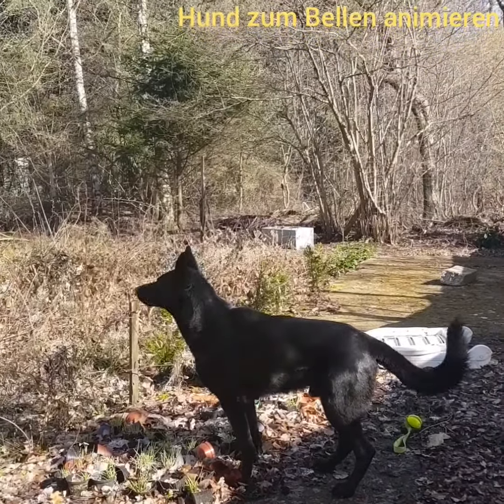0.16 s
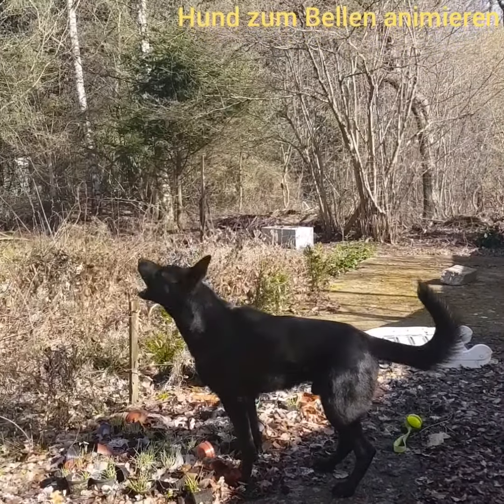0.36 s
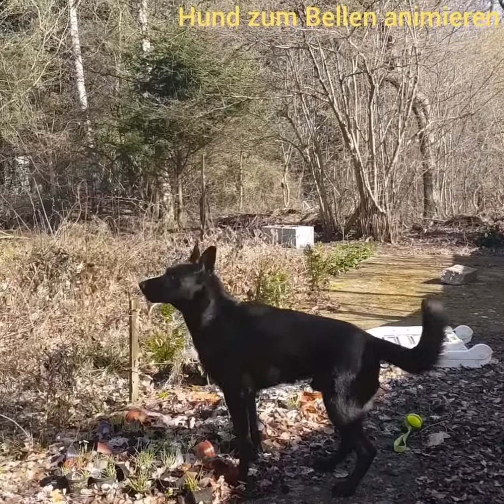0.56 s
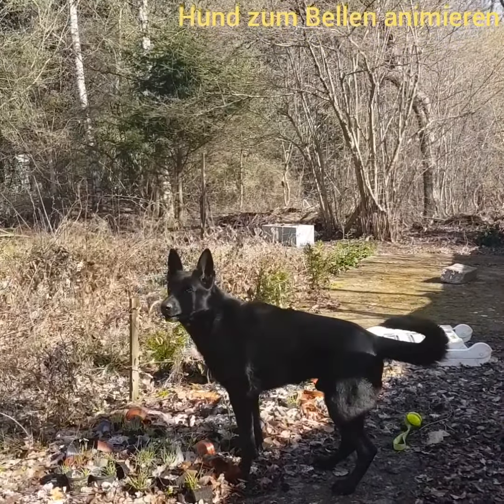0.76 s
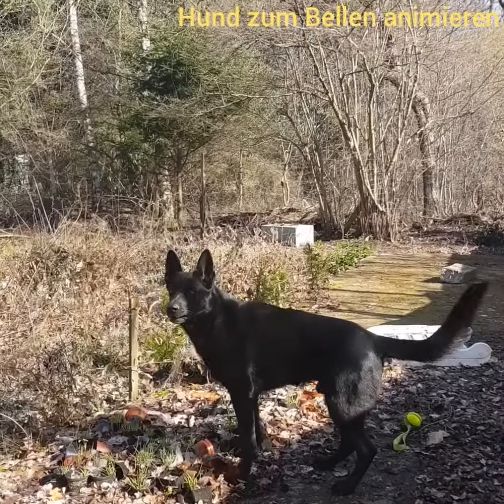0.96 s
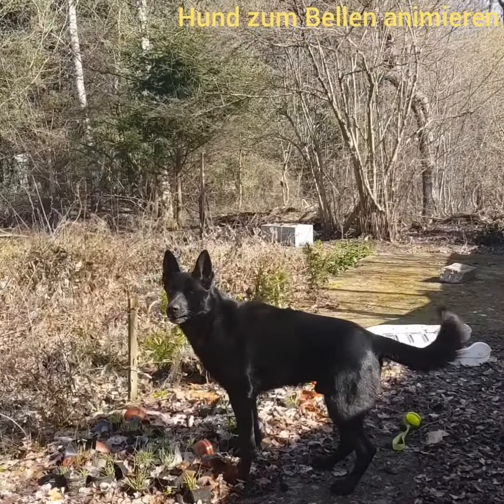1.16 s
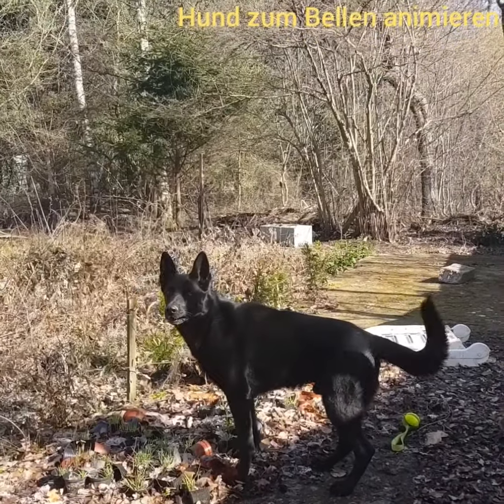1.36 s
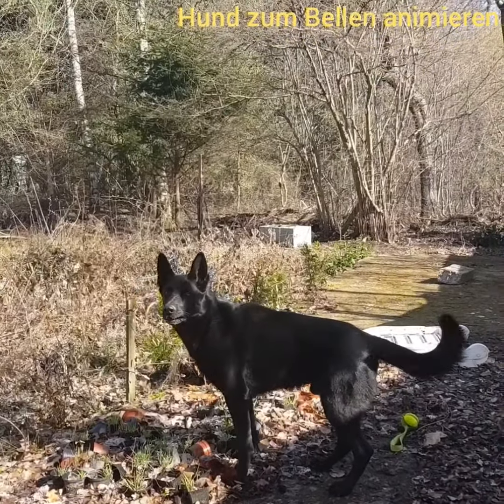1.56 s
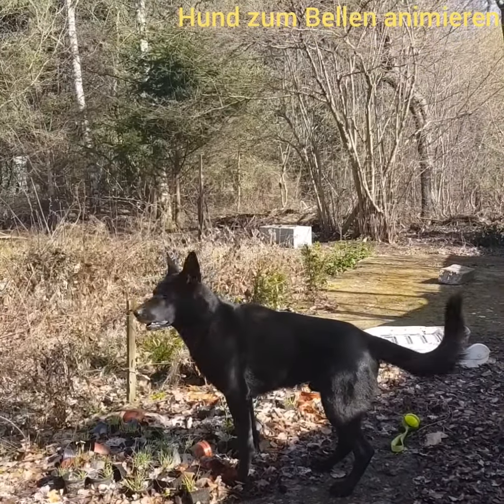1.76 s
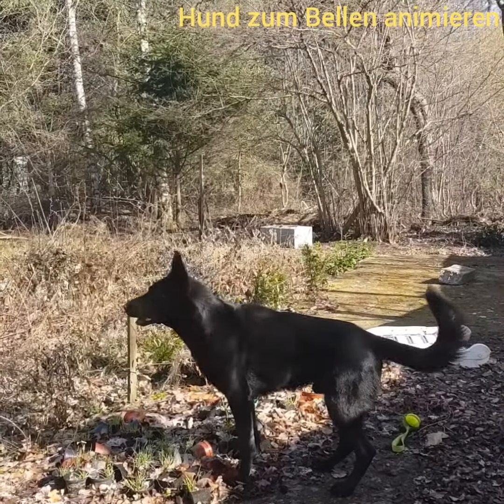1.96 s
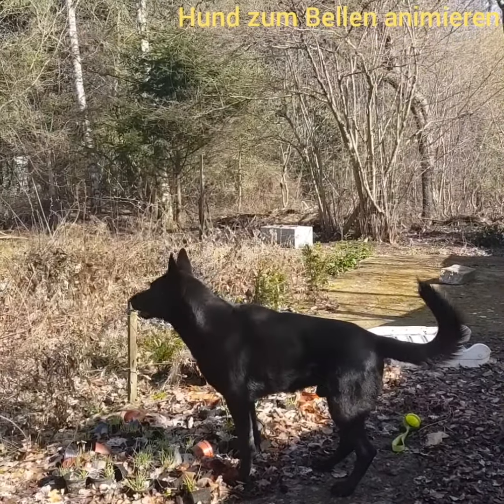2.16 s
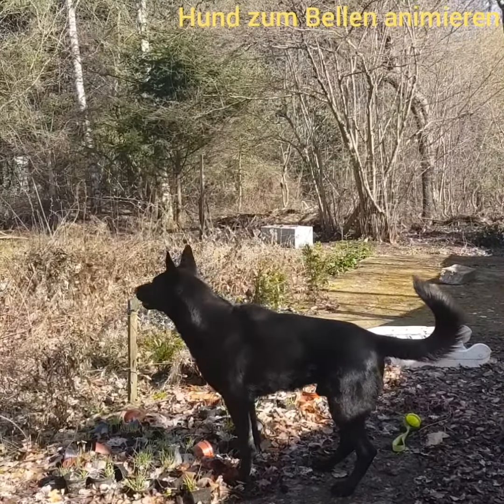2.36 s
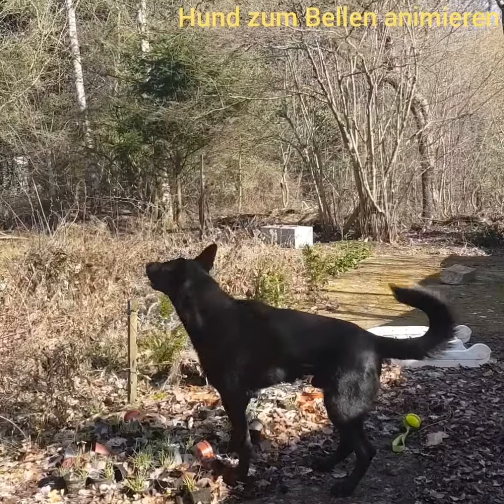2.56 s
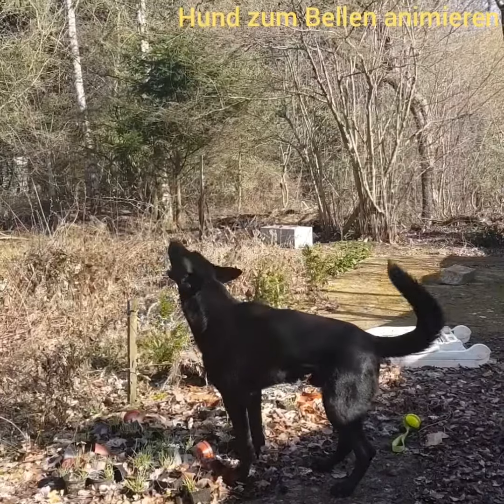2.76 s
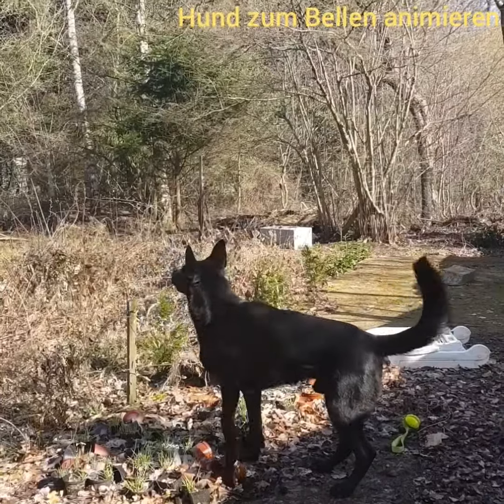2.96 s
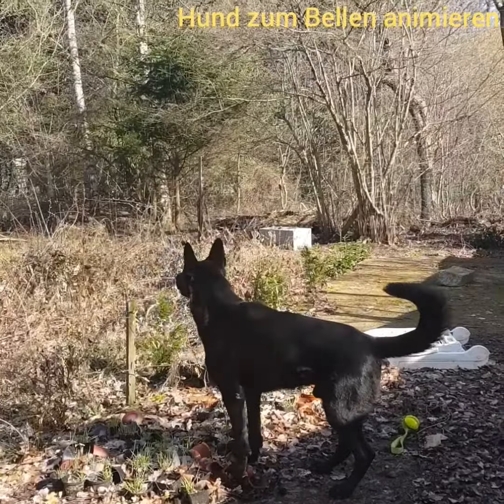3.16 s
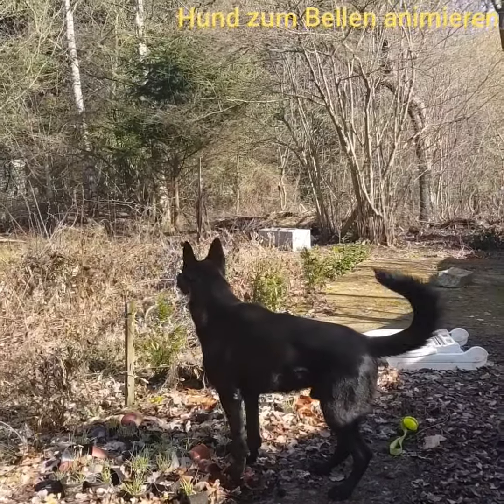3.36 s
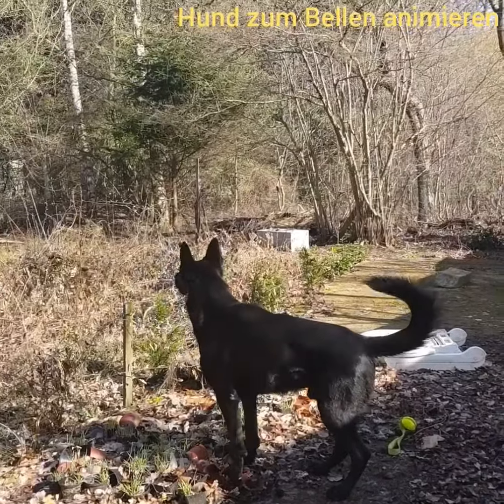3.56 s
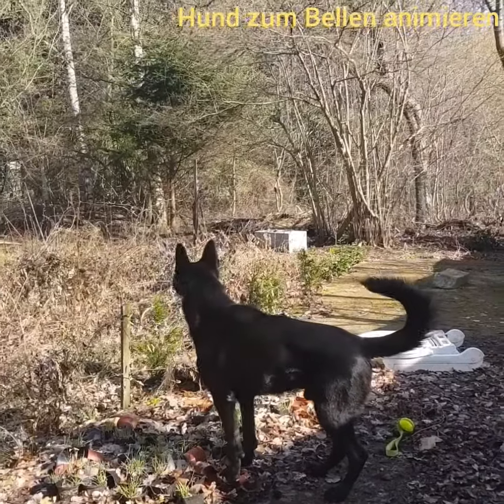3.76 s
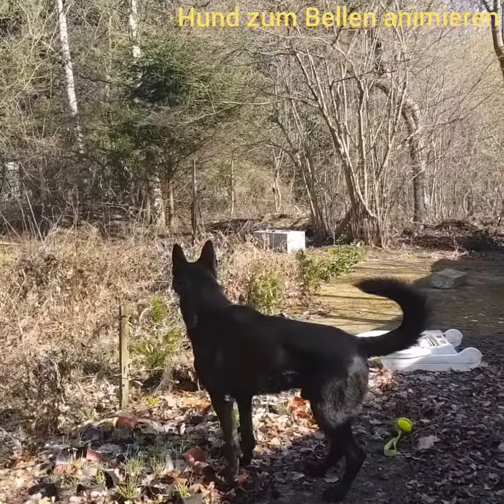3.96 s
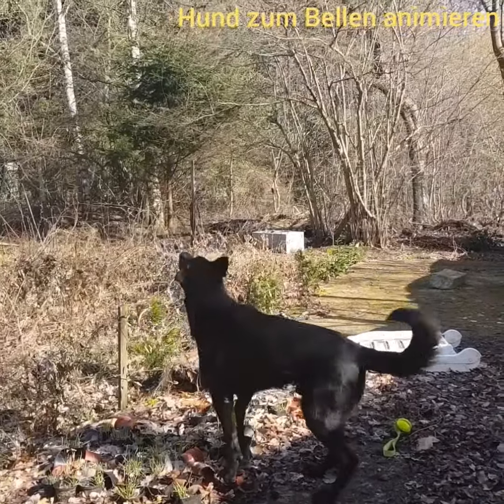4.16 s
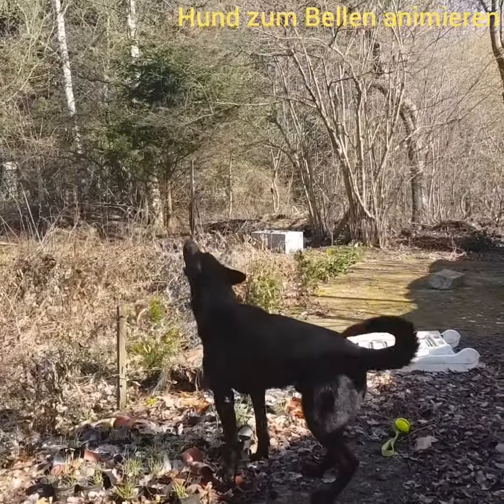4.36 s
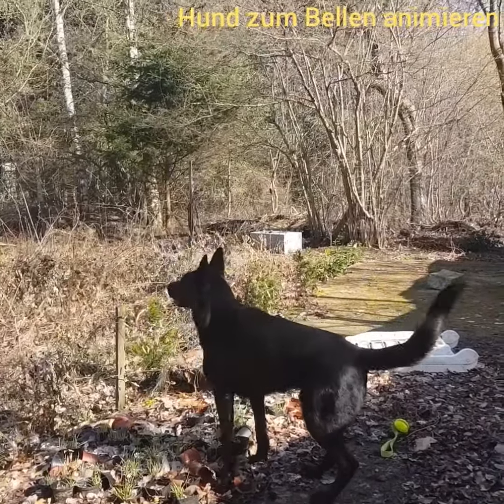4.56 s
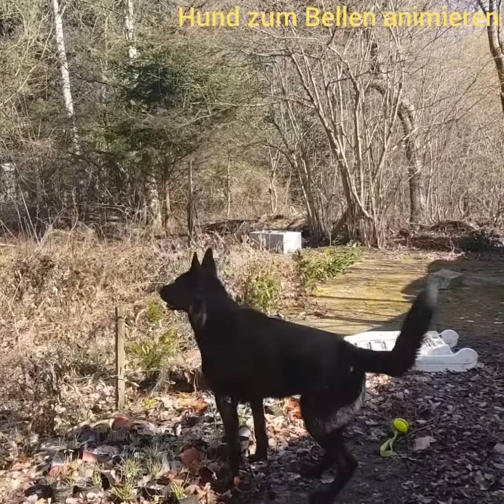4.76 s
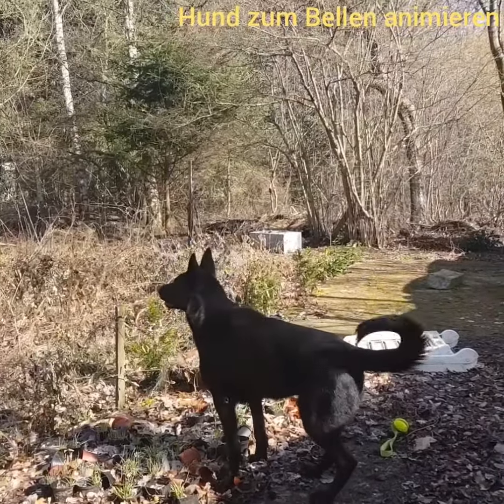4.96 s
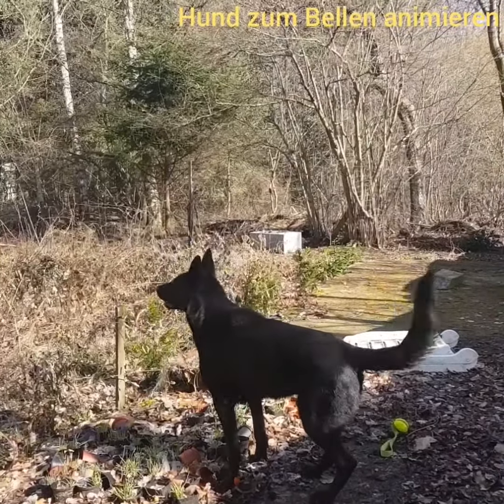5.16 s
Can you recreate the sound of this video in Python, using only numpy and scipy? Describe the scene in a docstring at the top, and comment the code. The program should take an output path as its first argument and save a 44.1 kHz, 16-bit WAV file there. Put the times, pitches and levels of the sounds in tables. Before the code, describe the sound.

A large dog barks once, then two quick pairs of hoarse barks with low growls, in a quiet leafy garden by a wood.

```python
"""A garden at the edge of a wood: a road drones, a bass rumble swells, dry leaves rustle, far engine tones waver.
A large dog a few metres from a phone barks once, then twice, then twice, with low growls around the barks.
Each bark is an arching pitch with a strong second partial, a second throat tone beating against it, and breath.
Near sheds, foliage and far trunks answer each bark as decaying noise echoes.
From 1.7 s on, dry leaves also tick now and then: short bursts of noise."""
import sys
import numpy as np
from scipy import signal
from scipy.fft import rfft, irfft
from scipy.io import wavfile
from scipy.ndimage import uniform_filter1d, minimum_filter1d

SR = 44100
rng = np.random.default_rng(int(sys.argv[2]) if len(sys.argv) > 2 else 0)


def store_wav(level_fs):
    """Save 16-bit WAV to argv[1]."""
    pcm = np.round(np.clip(np.atleast_2d(level_fs), -1, 1) * 32767)
    wavfile.write(sys.argv[1], SR, pcm.T.astype(np.int16))


N = 229275
T = np.arange(N) / SR


def undb(db):
    """Turn decibels into a plain factor."""
    return 10 ** (np.asarray(db) / 20)


def unit(x):
    """Scale to an average (rms) level of 1."""
    return x / np.sqrt(np.mean(x ** 2))


def tracks(tables, silent):
    """Draw each column as a smooth curve; silent columns go from dB to factors and fade out between tables."""
    rows = np.vstack(tables)
    columns = [np.interp(T, rows[:, 0], c) for c in rows.T[1:]]
    inside = sum((T >= t[0][0]) & (T <= t[-1][0]) for t in tables)
    fade = uniform_filter1d(1. * inside, size=600)
    return [undb(c) * fade if k in silent else c for k, c in enumerate(columns)]


def resonate(x, modes):
    """Sum of resonances, each applied twice for dark valleys between them."""
    out = 0
    for hz, width_hz, db in modes:
        b, a = signal.iirpeak(hz, hz / width_hz, fs=SR)
        once = signal.lfilter(b, a, x)
        out = out + undb(db) * signal.lfilter(b, a, once)
    return out


def walk(rate):
    """Smooth chance with spread 1, changing about rate times a second."""
    k = int(SR / rate)
    smoothed = uniform_filter1d(rng.standard_normal(N), k)
    return unit(uniform_filter1d(smoothed, k))


def wide_noise(points, alike_hz, flicker_db):
    """Stereo noise whose half-octave bands flicker one by one; the ears grow alike below alike_hz."""
    hz, db = np.transpose(points)
    f = np.maximum(np.fft.rfftfreq(N, 1 / SR), 1)
    spectrum = undb(np.interp(np.log(f), np.log(hz), db, -120, -120))
    mid, side = rfft(rng.standard_normal((2, N))) * spectrum
    side = side * f / np.hypot(f, alike_hz)
    ears = np.array([mid + side, mid - side])
    out = 0
    for centre in 2 ** np.arange(np.log2(hz[0]), np.log2(hz[-1]) + .5, .5):
        band = np.cos(np.pi * np.clip(np.log2(f / centre), -.5, .5))
        out = out + undb(flicker_db * walk(12)) * irfft(band * ears, N)
    return unit(out)


# loudness of the garden noises: (time [s], road level [dB], rumble level [dB], leaf rustle level [dB])
GARDEN_LEVELS = [(0.0, -48.5, -55, -67.5), (0.3, -45.5, -52, -63.5), (0.77, -49, -62, -66.5),
                 (1.04, -50.5, -60, -70.5), (1.51, -53, -67, -67), (1.75, -50, -59, -64),
                 (2.0, -46.5, -55.5, -59), (2.35, -47.5, -47, -61), (2.7, -48, -59.5, -62.5),
                 (3.19, -53.5, -59, -65), (3.58, -55, -58.5, -71), (3.84, -53.5, -61.5, -65.5),
                 (4.1, -49.5, -52.5, -60.5), (4.6, -51.5, -60, -62), (4.92, -53, -68, -64.5),
                 (5.2, -54, -63, -65)]
# colour of each noise, only the shape counts: (frequency [Hz], relative density [dB])
ROAD_SPECTRUM = [(65, -42.5), (110, 0.5), (137, -1), (156, -4), (211, -8), (521, -6), (682, -10),
                 (1140, -8.5), (6000, -30), (7800, -34.5), (13200, -120)]
RUMBLE_SPECTRUM = [(12, -50.5), (20, -31.5), (48, 4.5), (64, -1), (86, -2.5), (130, -18), (170, -38.5),
                   (290, -120)]
RUSTLE_SPECTRUM = [(1760, -30.5), (3000, -7), (5480, -7.5), (7430, -4.5), (8600, -7), (11700, -6.5),
                   (14600, -11)]
# far engines, one list per spell: (time [s], tone [Hz], level [dB])
ENGINE_TONES = [
    [(0.0, 129.7, -45), (0.144, 137.6, -64.5), (0.362, 146.5, -43.5), (0.534, 149, -68),
     (0.582, 155.3, -50), (1.0, 169, -70)],
    [(3.3, 114, -73.5), (4.208, 145.2, -56.5), (4.288, 143.4, -52), (4.404, 149.8, -54),
     (4.484, 136.5, -58), (4.6, 146, -56), (5.199, 156.8, -60.5)],
]


def garden():
    """Noises shaped like a road, a bass rumble and leaves, plus an engine tone with another at a third its pitch."""
    road, rumble, rustle = tracks([GARDEN_LEVELS], silent=(0, 1, 2))
    hz, engine = tracks(ENGINE_TONES, silent=(1,))
    turn = 2 * np.pi * np.cumsum(hz) / SR
    waver = undb(2 * walk(36))
    tone = np.sqrt(2) * engine * waver * (np.sin(turn) + undb(-5.5) * np.sin(turn / 3))
    crackle = undb(0.69 * walk(60))
    return (road * wide_noise(ROAD_SPECTRUM, alike_hz=1460, flicker_db=3.5)
            + rumble * wide_noise(RUMBLE_SPECTRUM, alike_hz=150, flicker_db=3.5)
            + rustle * crackle * wide_noise(RUSTLE_SPECTRUM, alike_hz=6860, flicker_db=-1.0)
            + tone)


# a chest growl that leads barks in and trails them, one list per growl: (time [s], pitch [Hz], level [dB])
GROWLS = [
    [(0.36, 151.4, -41), (0.376, 158.4, -52), (0.42, 198, -32.5), (0.44, 200, -45)],
    [(2.37, 203.5, -64), (2.404, 202.4, -52.5), (2.458, 218, -34.5), (2.47, 224, -43.5)],
    [(2.6, 177.3, -52), (2.626, 173.6, -46.5), (2.688, 142.2, -48), (2.76, 180.2, -45.5)],
    [(2.88, 196, -46.5), (2.914, 197.7, -51.5), (2.946, 224, -57.5), (3.06, 204.5, -58)],
    [(3.99, 179.4, -63), (4.028, 187, -58), (4.08, 184.1, -38), (4.09, 185.1, -48)],
    [(4.2, 152.3, -60), (4.266, 151.8, -45), (4.282, 158.5, -50), (4.34, 182.7, -47.5)],
]


def growl():
    """A low tone from the chest, slightly shaky in level."""
    hz, size = tracks(GROWLS, silent=(1,))
    shake = undb(1.5 * walk(40))
    return np.sqrt(2) * size * shake * np.sin(2 * np.pi * np.cumsum(hz) / SR)


# effort is the 2nd partial's level with its short breaks bridged, counted in dB from full voice
FULL_DB, BREAK_S = -7, .05
UPPER_PER_DB, BREATH_PER_DB = 0.96, 0.7  # dB that upper voice and breath change for each dB of effort
SATURATES_DB = -1.5  # breath grows no further above this effort
FIRST_PER_DB = 0.72  # the 1st partial falls more slowly than effort, so it leads the bark in
FIRST_IN_BREAK = 0.31  # dB that the 1st partial gains for each dB of a break
OPEN_HZ, CHOKE_DB_PER_HZ, CHOKED_DB = 348, .45, -22.5  # below this pitch the 1st partial is choked, to a limit
REST_HZ, TONE_PER_HZ = 199.05, .3  # the throat tone climbs with the pitch, counted from this pitch
ROUGH_PER_DB, ROUGH_PER_HZ_S = .025, 6e-5  # a weak 2nd partial and fast glides roughen the voice
HISS_AT_DB, HISS_S = -12, .022  # effort at which the mouth bursts open; decay of that hiss

# five barks, one list each; the 2nd partial dips where the voice breaks:
# (time [s], pitch before wobble [Hz], 2nd partial level [dB], throat tone level [dB])
BARK_CURVES = [
    [(.37, 150.2, -72.5, -59), (.4, 166.7, -28.5, -30.5), (.415, 207.3, -21, -16), (.432, 230.8, -5.5, -21),
     (.442, 320.4, -10.5, -17), (.472, 360, -11.5, -25), (.487, 358.3, -14, -29), (.505, 378, -10.5, -18),
     (.528, 330.4, -6.5, -17), (.545, 262.4, -14, -49), (.57, 200, -62, -97)],
    [(2.38, 100.8, -73, -58), (2.425, 140.2, -49.5, -35), (2.45, 201.5, -23, -24.5),
     (2.465, 310.3, -14, -21), (2.48, 318, -10, -19.5), (2.5, 350, -10, -15.5), (2.522, 352.7, -6, -14.5),
     (2.536, 384.8, -16, -4), (2.555, 368, -6.5, -34.5), (2.59, 280.3, -14, -37.5),
     (2.612, 238.5, -17, -45.5), (2.65, 191.1, -53.5, -55.5)],
    [(2.71, 171, -77.5, -41.5), (2.74, 194.7, -26, -25), (2.769, 235.8, -12, -10), (2.78, 317, -8.5, -13),
     (2.8, 342.4, -11, -23.5), (2.825, 345, -6.5, -25.5), (2.85, 341.2, -11, -36), (2.87, 276.8, -13, -42),
     (2.885, 219.3, -20, -67.5), (2.905, 206.4, -20, -83), (2.94, 190, -51, -89.5)],
    [(3.98, 110.2, -77.5, -58), (4.03, 129.9, -61, -45.5), (4.06, 166.4, -40.5, -33),
     (4.082, 230.6, -18.5, -19), (4.11, 344.1, -2.5, -15.5), (4.128, 366.1, -17.5, -23),
     (4.145, 378.7, -5.5, -19.5), (4.165, 340.5, -23, -9.5), (4.18, 364.2, -6.5, -19),
     (4.198, 303, -11, -29), (4.225, 259, -23, -19.5), (4.265, 200, -47, -42)],
    [(4.29, 166.9, -80.5, -44), (4.32, 183.9, -22, -47), (4.338, 206.1, -16.5, -48.5),
     (4.355, 309.7, -3.5, -44), (4.372, 332.7, -4.5, -45), (4.405, 350.6, -16, -16.5),
     (4.432, 334.6, -4, -43), (4.452, 279.8, -12, -37), (4.472, 216.7, -15.5, -50),
     (4.5, 195.2, -52.5, -63)],
]
# colour of each bark at full effort: (roughness [0-1], 1st partial level [dB], upper voice level [dB],
# lower mouth resonance gain [dB], breath level [dB], onset hiss level [dB], throat tone at REST_HZ [Hz])
BARK_COLOURS = [(0.29, -17.5, -22.5, -1, -39.5, -49, 445), (0.38, -20, -25.5, 1.5, -41.5, -38.5, 435),
                (0.14, -18, -29, 0, -47, -41, 450), (0.37, -17, -29, 1, -44, -52, 435),
                (0.13, -19.5, -31.5, -3.5, -48, -55, 455)]


def controls():
    """Pitch and effort set the level of the voice's parts, its roughness and the throat tone's pitch."""
    hz, second, tone = tracks(BARK_CURVES, silent=(1, 2))
    second_db = 20 * np.log10(second + 1e-6)
    starts = [bark[0][0] for bark in BARK_CURVES]
    which = np.maximum(np.searchsorted(starts, T) - 1, 0)
    hoarse, first_db, upper_db, jaw_db, breath_db, hiss_db, tone_hz = np.array(BARK_COLOURS)[which].T
    tone_hz = tone_hz + TONE_PER_HZ * (hz - REST_HZ)

    # a running maximum, then a running minimum, bridge the breaks
    span = int(BREAK_S * SR)
    highest = -minimum_filter1d(-second_db, size=span)
    bridged_db = minimum_filter1d(highest, size=span)
    effort = bridged_db - FULL_DB

    break_depth = effort + FULL_DB - second_db
    first_db = first_db + FIRST_PER_DB * np.minimum(effort, 0) + FIRST_IN_BREAK * break_depth
    first_db = first_db + np.clip(CHOKE_DB_PER_HZ * (hz - OPEN_HZ), CHOKED_DB, 0)

    glide = np.abs(np.gradient(hz)) * SR  # Hz per second
    rough = hoarse + ROUGH_PER_DB * np.maximum(FULL_DB - second_db, 0) + ROUGH_PER_HZ_S * glide
    rough = uniform_filter1d(np.clip(rough, 0, .6), size=300)

    opens = np.diff(1. * (effort > HISS_AT_DB), prepend=0) > 0
    hiss = undb(hiss_db) * signal.lfilter([1], [1, -np.exp(-1 / (HISS_S * SR))], opens)
    hiss = uniform_filter1d(hiss, size=200)

    breath_db = breath_db + BREATH_PER_DB * np.minimum(effort - SATURATES_DB, 0)
    levels = undb([first_db, upper_db + UPPER_PER_DB * effort, jaw_db, breath_db])
    return hz, tone_hz, rough, second, tone, hiss, levels


# resonances, each passed twice: (frequency [Hz], width of one pass [Hz], relative gain [dB])
THROAT_RESONANCES = [(470.6, 268, 3), (651.3, 307, 2.5)]
# the two mouth resonances, the lower one also moved by the bark's colour: same columns
MOUTH_RESONANCES = [(1240, 260, 0), (1900, 340, -6)]
# whistling gaps between the teeth: same columns
TEETH_GAPS = [(4433, 630, 1.5), (5000, 5200, -4.5), (7200, 390, -5), (10160, 2000, -15)]


def dog():
    """Vocal folds sing clean partials; a second tone beats with them and rocks the buzz; air hisses each cycle."""
    hz, tone_hz, rough, second, tone, hiss, (first, upper, jaw, breath) = controls()
    phase = 2 * np.pi * np.cumsum(hz * (1 + .04 * rough * walk(150))) / SR
    beat = 2 * np.pi * np.cumsum(tone_hz * (1 + .06 * rough * walk(120))) / SR

    shimmer = undb(4 * rough * walk(120))
    low = second * shimmer * np.sin(2 * phase) + first * np.sin(phase + 1.7)
    low = low + tone * undb(3.08 * walk(120)) * np.sin(beat)
    # while the pitch is low the third partial falls on the throat resonance
    on_throat = np.exp(-((3 * hz - 670) / 90) ** 2)
    low = low + second * undb(-5) * on_throat * np.sin(3 * phase + 1.97)

    puff = np.exp(.8 * np.cos(phase))  # air flow of each cycle
    throat_noise = resonate(puff * rng.standard_normal(N), THROAT_RESONANCES)
    rasp = second * rough * undb(-0.5) * unit(resonate(throat_noise, THROAT_RESONANCES))

    def mouth(x):
        return jaw * resonate(x, MOUTH_RESONANCES[:1]) + resonate(x, MOUTH_RESONANCES[1:])

    buzz = sum(undb(3 * walk(40)) * np.cos(k * phase) for k in range(2, 8))  # each partial wavers alone
    # the second tone rocks the closing of the folds: sidebands round the upper partials
    rocking = (.3 + 1.5 * rough) * undb(4 * walk(30)) * np.cos(beat)
    buzz = buzz * (1 + rocking)
    buzz = unit(mouth(buzz)) + .7 * rough * unit(mouth(puff * rng.standard_normal(N)))
    # side pockets of the throat cut the voice above here
    buzz = signal.sosfilt(signal.butter(6, 2250, fs=SR, output="sos"), buzz)

    # the jet of air sputters in and out of each gap; one noise is shared, two belong to one ear each
    air = sum(undb(3 * walk(40)) * resonate(puff * rng.standard_normal((3, N)), [gap]) for gap in TEETH_GAPS)
    air = unit(air[0] + 2.2 * air[1:])
    burst = unit(resonate(rng.standard_normal((2, N)), [(5700, 1300, 0)]))
    return np.sqrt(2) * low + rasp, upper * buzz, breath * air + hiss * burst


# how far the right port runs ahead of the left: (frequency [Hz], phase lead [radians])
RIGHT_PHASE_LEAD = [(0, 0), (300, .3), (650, .9), (1200, 1.25), (2100, .55), (4000, .9)]
LEFT_LOW_DB = 2


def ports(x):
    """The right port hears the dog first; the left one is fuller in the low mids."""
    lag = np.interp(np.fft.rfftfreq(N, 1 / SR), *np.transpose(RIGHT_PHASE_LEAD))
    late = irfft(rfft(x) * np.exp(-1j * lag), N)
    fuller = (undb(LEFT_LOW_DB) - 1) * resonate(late, [(379, 150, 0.011)])
    return np.array([late + fuller, x])


def echo(x, start, rise, t60, low_hz, high_hz):
    """Many scatterers: a decaying noise response that differs between the ears."""
    t = np.maximum(T[:2 * SR] - start, 0)
    shape = (1 - np.exp(-t / rise)) * 1000 ** (-t / t60)
    common, apart = rng.standard_normal((2, len(t)))
    response = shape * (common + 0.33 * apart * np.array([[1], [-1]]))
    band = signal.butter(4, [low_hz, high_hz], "band", fs=SR, output="sos")
    response = signal.sosfilt(band, response)
    response = response / np.sqrt(np.mean(np.sum(response ** 2, axis=1)))
    return signal.fftconvolve(np.broadcast_to(x, (2, N)), response, axes=1)[:, :N]


# what answers the dog: (start [s], build-up [s], time to fall 60 dB [s], low edge [Hz], high edge [Hz])
SHED_ECHO = (.01, .01, .32, 300, 6000)
FOLIAGE_ECHO = (.03, .04, .45, 900, 12000)
TRUNK_ECHO = (.1, .06, 2.2, 680, 1000)
SHEDS_DB, TRUNKS_DB = -22, -51
FOLIAGE_VOICE_DB, FOLIAGE_AIR_DB = -22.5, -14.5


def echoes(bark, low, upper, air):
    """Sheds return the whole bark, foliage the upper voice and breath, trunks the voice in a narrow band."""
    leaves = undb(FOLIAGE_VOICE_DB) * upper + undb(FOLIAGE_AIR_DB) * air
    return (undb(SHEDS_DB) * echo(bark, *SHED_ECHO)
            + undb(TRUNKS_DB) * echo(low + upper, *TRUNK_ECHO)
            + echo(leaves, *FOLIAGE_ECHO))


# snapping leaves: (time [s], peak level [dB], centre of the noise [Hz])
LEAF_TICKS = [(1.669, -45, 9570), (3.0588, -51, 10180), (3.159, -48, 10810), (3.483, -49.5, 11280),
              (3.904, -47.5, 7270), (4.596, -36, 7730), (4.6458, -43.5, 7850), (4.7058, -45, 10260),
              (4.8342, -46, 7810), (5.061, -46, 7560)]


def ticks():
    """Dry leaves snap: short bursts of noise round a high pitch."""
    size = 600  # samples
    out, t = np.zeros((2, N + size)), T[:size]
    for s, db, hz in LEAF_TICKS:
        start = int(s * SR)
        snap = rng.standard_normal((2, size)) * np.exp(-t / 0.0039)
        burst = resonate(snap, [(hz, 3500, 0)])
        out[:, start:start + size] += undb(db) * burst / np.abs(burst).max()
    return out[:, :N]


def scene():
    """Add the garden, the dog with its echoes, and the leaf ticks."""
    low, upper, air = dog()
    bark = ports(low + upper + growl()) + air
    return garden() + bark + echoes(bark, low, upper, air) + ticks()


TOP_HZ = 14600


def record(dry):
    """The phone's limiter holds the loudest peaks; its filter cuts the top."""
    peak = np.abs(dry).max(axis=0) + 1e-9
    gain = minimum_filter1d(np.minimum(1, .88 / peak), size=260)
    held = dry * uniform_filter1d(gain, size=260)
    return signal.sosfilt(signal.ellip(10, .2, 70, TOP_HZ, fs=SR, output="sos"), held)


dry = scene()
out = record(dry)
store_wav(out)
```